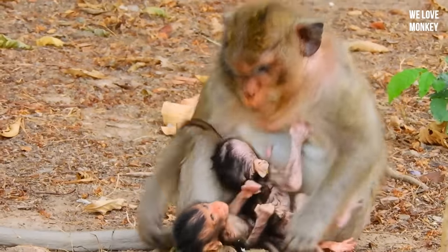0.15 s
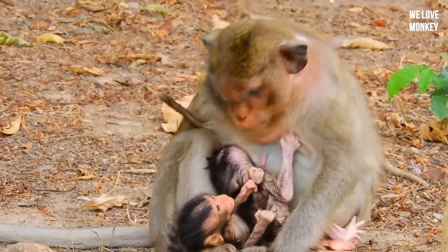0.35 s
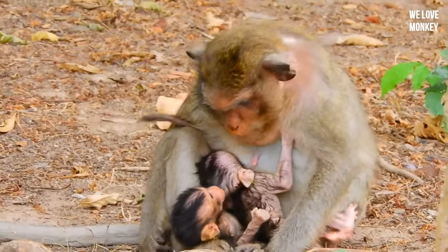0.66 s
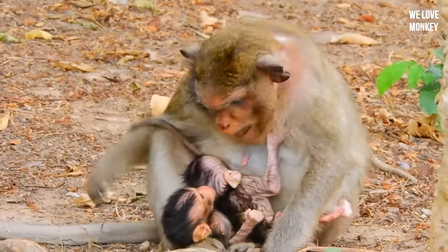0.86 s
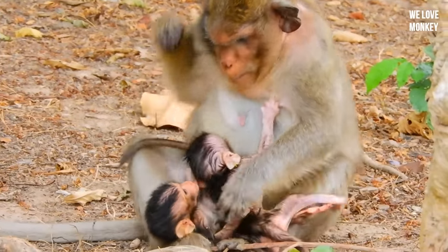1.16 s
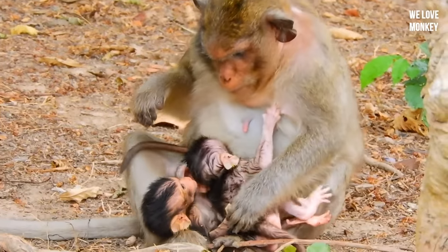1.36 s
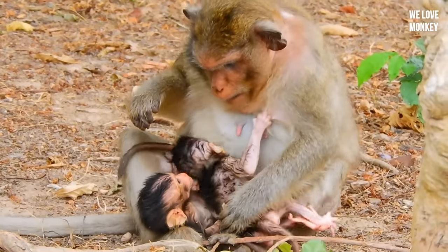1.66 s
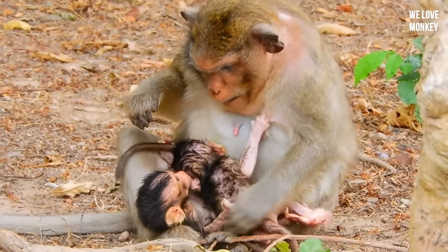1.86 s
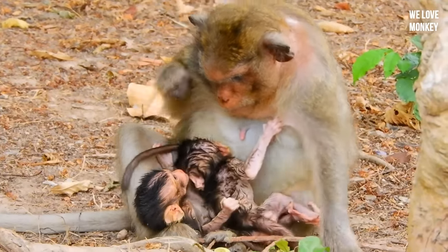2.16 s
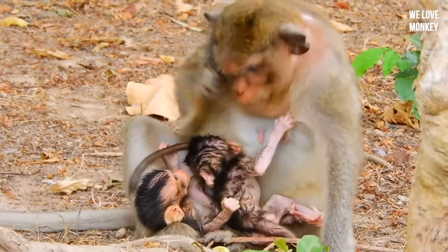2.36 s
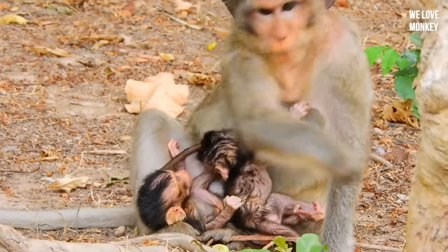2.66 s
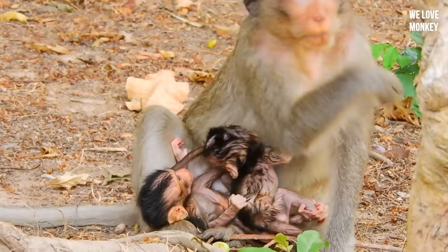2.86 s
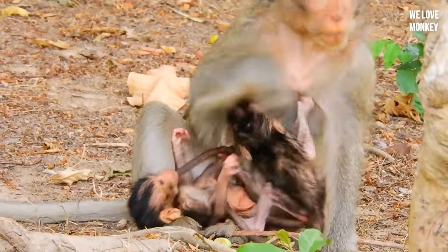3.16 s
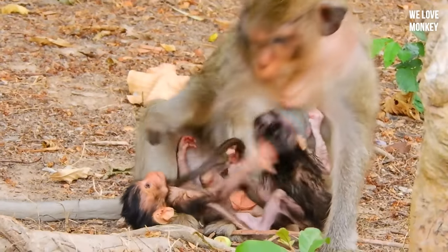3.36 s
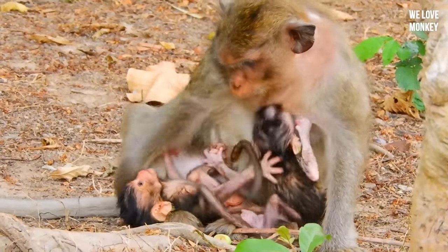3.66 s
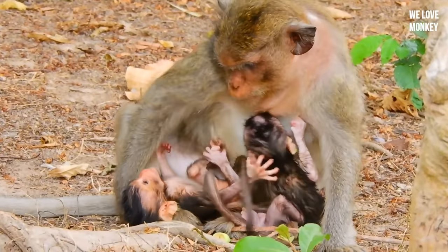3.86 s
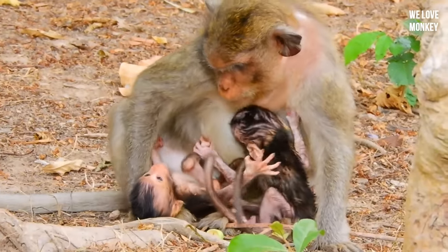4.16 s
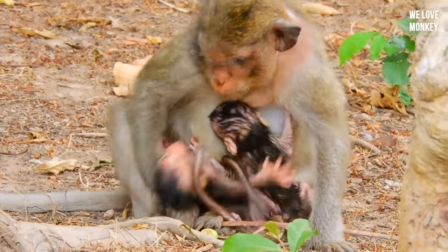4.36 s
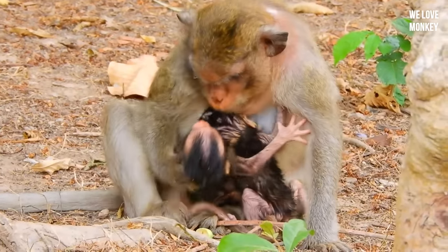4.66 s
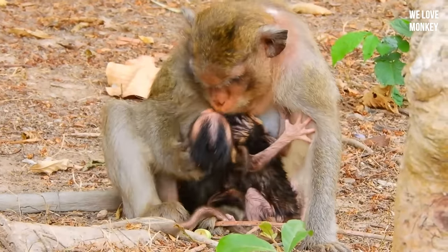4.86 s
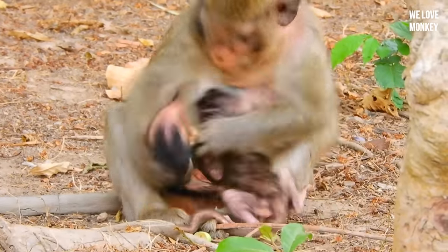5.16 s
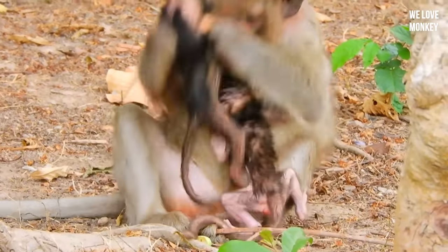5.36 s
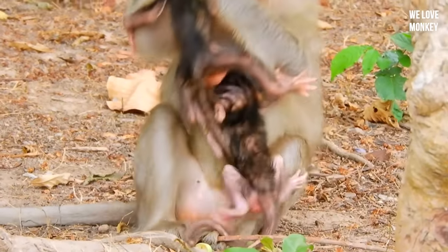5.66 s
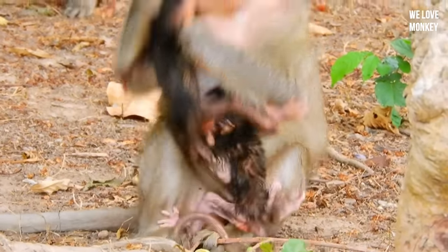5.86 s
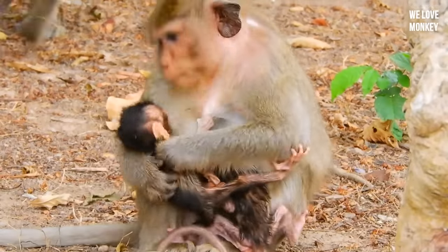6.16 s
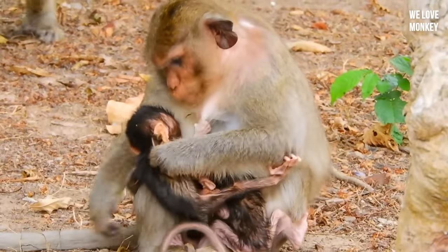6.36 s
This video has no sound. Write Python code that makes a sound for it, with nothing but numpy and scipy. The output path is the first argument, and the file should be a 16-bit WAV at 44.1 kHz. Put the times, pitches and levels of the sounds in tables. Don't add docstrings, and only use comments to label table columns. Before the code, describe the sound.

Outdoors under trees, close stereo microphone. At once a newborn monkey gives a very high, piercing cry that roughens into a thin rasping scream, breaking off at about 0.27 s with a short scattered echo. Soft insect hiss, a faint tyre whine and low, slowly swelling traffic rumble continue throughout. Tiny dry taps and snaps fall at 0.4, 0.7 and 0.9 s. From 0.7 to 1.65 s a far bird, off to the left, faintly pipes four thin notes. After a lull, clipped harsh chirps, mostly falling, come from 2.8 to 4.05 s, strongest around 3.0, 3.6 and 3.8. From 4.2 to 5.3 s dry leaves rustle and crunch, with a hand press and a loud crisp snap at 5.1. A wavering, raspy cry follows at 5.36-5.56 s, falling in pitch. Further leaf crackles come around 6.0, with a light touch at 6.2 and a faint crunch at 6.4.

```python
import sys
import numpy as np
from scipy import signal
from scipy.io import wavfile
from scipy.ndimage import uniform_filter1d, map_coordinates

SR = 44100
rng = np.random.default_rng(int(sys.argv[2]) if len(sys.argv) > 2 else 0)


def digitize_waveform(pressure):
    field = np.atleast_2d(pressure).T
    bounded = np.clip(field, -1, 1)
    quanta = np.round(bounded * 32767).astype(np.int16)
    wavfile.write(sys.argv[1], SR, quanta)


def ratio(d):
    e = np.asarray(d, float) / 20
    return 10 ** e


N = 287091
TIME = np.arange(N) / SR


def squeaks():
    return whistled_cries() + lower_voice() + rasp()


# t/s, f/Hz, level/dB, roughness/0-1
SCREAM = [
    (0.042, 9300, -14, 0.42),
    (0.06, 9000, -29.5, 0.68),
    (0.08, 9600, -20.5, 0.4),
    (0.11, 10000, -23, 0.65),
    (0.124, 10550, -28, 0),
    (0.147, 10700, -29.5, 0.1),
    (0.163, 11200, -38.5, 0.33),
    (0.18, 10500, -30.5, 0.65),
    (0.222, 10310, -30, 0.7),
]
# t/s, length/s, level/dB, f from/Hz, f to/Hz
LAST_GASP = [
    (.224, 0.02, -22, 9660, 9270),
]
# t/s, length/s, level/dB, f from/Hz, f to/Hz
CHIRPS = [
    (2.826, 0.0083, -31.5, 6300, 4952),
    (2.968, .045, -19.5, 8390, 5540),
    (3.15, 0.036, -28.5, 11600, 9200),
    (3.179, 0.028, -21.5, 7780, 6770),
    (3.371, .028, -19, 6910, 4765),
    (3.588, .021, -21, 8220, 7380),
    (3.611, .024, -13, 9200, 4068),
    (3.782, .019, -16.5, 7990, 8213),
    (3.803, 0.02, -11, 8345, 7575),
    (4.027, .011, -19.5, 6470, 4150),
]
# t/s, f/Hz, level/dB
PURE = [
    [(0.002, 8190, -46), (0.01, 8630, -16), (0.017, 8690, -16.5), (0.023, 9130, -22), (0.032, 9252, -2.5),
     (0.041, 9100, -9), (0.045, 9500, -40)],
    [(5.358, 6223, -51.5), (5.397, 5940, -51), (5.418, 7330, -33.5), (5.437, 6870, -32.5),
     (5.456, 6890, -21), (5.478, 5717, -20.5), (5.495, 5400, -28), (5.523, 4594, -20), (5.543, 4646, -31)],
]


def whistled_cries():
    rough_cries = [SCREAM] + sung_notes(LAST_GASP, (.1, .02)) + sung_notes(CHIRPS, (.5, .2))
    pure_cries = [[(*row, .012) for row in cry] for cry in PURE]
    return band(whistle(rough_cries), 3700, 19000) + whistle(pure_cries)


# t/s, level below the whistle/dB
BEATING = [
    (0, -27),
    (.04, -26.5),
    (.09, -19.5),
    (.25, -25.5),
    (2.8, -47.5),
    (3.6, -26),
    (5.35, -43),
    (5.46, -35.5),
]
# t/s, level/dB
OVERTONE = [
    (0, -40),
    (3.8, -34),
    (4.03, -22.5),
    (5.35, -10),
    (5.46, -18),
    (5.48, -23),
    (5.51, -10),
]


def whistle(tables):
    height, phase = fold(tables, chaos_hz=960)
    beat = np.exp(2j * np.pi * 3916 * TIME)
    side = ratio(in_time(BEATING)[0])
    cycle = np.exp(1j * phase) * (1 + side * (1 / beat + .45 * beat) + 4.7 * (side / beat) ** 2)
    below_top = np.gradient(phase) < 2 * np.pi * 8000 / SR
    cycle += ratio(in_time(OVERTONE)[0]) * np.exp(2j * phase) * below_top
    return (height * cycle).real


# t/s, length/s, level/dB, f from/Hz, f to/Hz
VOICE = [(.224, .027, -33, 7410, 7165), (2.972, .044, -12, 5243, 4400), (3.165, .02, -34, 4934, 4850),
         (3.19, .026, -22.5, 5034, 4620), (3.362, 0.0125, -33, 3390, 3923),
         (3.376, 0.029, -22.5, 4200, 4134), (3.585, .022, -32.5, 3670, 4300),
         (3.608, .019, -20, 5264, 2905), (3.799, 0.012, -30, 3860, 3780), (3.814, 0.0155, -21, 4247, 4080),
         (4.021, 0.0125, -28, 3500, 2875)]
# t/s, length/s, level/dB, f from/Hz, f to/Hz
SPLIT = [
    (2.986, .026, -16.5, 9400, 8900),
    (3.182, .021, -15.5, 10200, 10000),
    (3.589, .032, -32, 12200, 11700),
    (3.776, .018, -31.5, 10220, 10200),
    (3.796, .028, -45, 14580, 14100),
    (5.464, .02, -25, 8400, 7000),
]


def lower_voice():
    out = np.zeros(N)
    for rows in (VOICE, SPLIT):
        height, phase = fold(sung_notes(rows, (.5, .25)), chaos_hz=648)
        out += (height * np.exp(1j * phase)).real
    return out


# t/s, length/s, upper mouth level/dB, lower mouth level/dB, chest level/dB
RASP = [(.044, 0.006, -22, -36, -62), (.053, 0.086, -32, -50, -69), (.122, 0.06, -31, -43, -68),
        (.168, 0.094, -29.5, -43.5, -65), (2.826, 0.017, -47, -54, -61), (2.967, 0.028, -14.5, -18, -54.5),
        (2.992, 0.02, -11, -10, -35), (3.147, 0.013, -27, -38, -62), (3.164, 0.02, -11, -24, -42),
        (3.183, 0.0364, -19, -24, -42), (3.371, 0.024, -22.5, -17, -30.5),
        (3.588, 0.021, -22.5, -21, -21.5), (3.609, 0.029, -25, -15, -33), (3.777, 0.025, -20, -30.5, -29.5),
        (3.805, 0.02, -35, -14.5, -12), (4.028, 0.021, -35, -47, -53), (5.364, 0.022, -36.5, -46.5, -72),
        (5.387, .064, -43.5, -53, -60), (5.455, .021, -32, -23, -49), (5.477, 0.041, -20.5, -13.5, -39),
        (5.513, 0.0473, -26.5, -19, -62)]
# f/Hz, width/Hz, level/dB
CHEST = [
    (3152, 2100, 1.5),
    (3500, 2100, 12.5),
]
# f/Hz, width/Hz, level/dB
LOW_MOUTH = [
    (4314, 590, -7),
    (5424, 2200, 12.5),
    (6400, 1570, -1.5),
]
# f/Hz, width/Hz, level/dB
HIGH_MOUTH = [
    (7500, 560, -2),
    (9000, 1332, 10),
    (10200, 2800, 2),
    (11000, 3300, 0.5),
    (14200, 2800, -26),
]


def rasp():
    levels = in_time(sum(bursts(RASP), []))
    high_db, low_db, chest_db = uniform_filter1d(levels, size=60)
    out = ratio(chest_db) * band(chaos(CHEST, slap_db=9.0, slap_hz=350.6), 2750, 4652)
    out += ratio(low_db) * band(chaos(LOW_MOUTH, slap_db=0.0, slap_hz=349), 4360, 7550)
    upper = chaos(HIGH_MOUTH, slap_db=1.9, slap_hz=350)
    out += ratio(high_db) * band(upper, 6000, 11760)
    strain_db = high_db + .42 * (chest_db - high_db) - 1.5
    out += ratio(strain_db) * band(upper, 11900, 21000)
    puffs = chaos([(1281, 2100, 0), (450, 400, -6.5)], slap_db=1.5, slap_hz=200)
    out += ratio(low_db - 30.5) * puffs
    return ratio(-5) * gate(bursts(RASP), edge_s=0.00106) * out


def fold(tables, chaos_hz):
    hz, level_db, rough = in_time(sum(map(list, tables), []))
    rough = np.clip(rough, 0, 1)
    noise = rng.standard_normal(N) + 1j * rng.standard_normal(N)
    wander = rms_one(signal.sosfilt(signal.butter(4, chaos_hz, fs=SR, output="sos"), noise))
    shape = np.sqrt(1 - rough) + np.sqrt(rough) * wander
    glide_s = 0.0072
    hz = uniform_filter1d(hz, int(glide_s * SR) + 1)
    hz = hz * (1 + .05 * rough * drift(150))
    height = np.sqrt(2) * ratio(level_db) * gate(tables, edge_s=.002) * shape
    return height, 2 * np.pi * np.cumsum(hz) / SR


def chaos(modes, slap_db, slap_hz):
    slaps = rng.standard_normal(N) * ratio(slap_db * drift(slap_hz))
    return rms_one(sum(ratio(db + 4.2 * drift(100)) * mouth(slaps, [(hz, w, 0)]) for hz, w, db in modes))


def sung_notes(rows, rough):
    share = np.array([0, 0.2786, 1 - 0.59, 1])
    shape_db = np.array([-11.5, 0, -5.5, -10])
    rough_curve = rough[0] + (rough[1] - rough[0]) * share
    return [list(zip(s + n * share, a + (b - a) * share, db + shape_db, rough_curve))
            for s, n, (_, _, db, a, b) in zip(*spans(rows), rows)]


def bursts(rows):
    rise_s, fall_s = 0.0083, .009
    shape_db = np.array([-8, 0, -2, -13])
    out = []
    for s, n, row in zip(*spans(rows), rows):
        at = s + np.array([0, min(rise_s, 0.66 * n), n - min(fall_s, .5 * n), n])
        out.append(list(zip(at, *(db + shape_db for db in row[2:]))))
    return out


# t/s, peak level/dB, length/s, brightness f/Hz
CRUNCH = [(4.269, -41, 0.017, 8080), (4.392, -39, 0.016, 8210), (4.499, -18, 0.018, 8700),
          (4.517, -22, 0.0052, 9200), (4.6117, -23, 0.0038, 8300), (4.684, -33.5, 0.017, 8230),
          (4.7464, -32, 0.025, 8300), (4.7974, -35, 0.01, 8650), (4.878, -29.5, 0.013, 6950),
          (5.103, -22.5, 0.026, 8360), (5.9834, -30, 0.012, 8460), (6, -22, 0.015, 8540),
          (6.025, -34.5, 0.039, 8160), (6.0868, -38, 0.0095, 5210), (6.4284, -41.5, 0.02, 9000)]
# t/s, peak level/dB, length/s, brightness f/Hz
SNAP = [(0.6689, -22, 0.00087, 6080), (0.9314, -24.5, 0.0015, 2850), (0.9408, -26.5, 0.0013, 5340),
        (4.6588, -45, 0.002, 8990), (4.7042, -21, 0.0015, 5400), (4.7124, -36, 0.002, 9200),
        (4.7545, -30, .0015, 7500), (4.7731, -30, 0.002, 9050), (4.8299, -28, 0.002, 6260),
        (4.9571, -24.5, 0.0011, 8950), (5.1012, -5.5, .001, 7500), (5.2545, -36.5, 0.0023, 7540),
        (5.9269, -28, 0.0024, 8400), (5.9688, -31, 0.002, 8590)]
# t/s, peak level/dB, length/s, brightness f/Hz
PAW = [
    (5.096, -22.5, 0.023, 4000),
    (6.2, -29, 0.0049, 9200),
    (0.37, -26, 0.0025, 1720),
]
# t/s, level/dB
RUSTLE = [
    [(4.15, -56.5), (4.498, -64.5), (4.614, -52), (5.3, -62.5)],
    [(5.74, -47), (6.206, -62.5), (6.51, -58.5)],
]
# f/Hz, width/Hz, level/dB
CRACKLE_PEAKS = [
    (3484, 1540, -4),
    (5130, 960, 6.5),
    (7680, 2700, 3.5),
    (9200, 1860, 8.5),
    (12200, 14000, -6),
]


def leaves():
    snaps = ratio(4.4 * np.minimum(rng.exponential(1, N), 4)) * rng.choice([-1, 1], N)
    chance = rng.random(N)
    dense = rms_one(snaps * (chance < 9000 / SR))
    body, own = np.zeros(N), np.zeros(N)
    t = TIME[:SR // 5]
    for s, db, length, hz in list(CRUNCH) + list(SNAP) + list(PAW):
        at = int(s * SR)
        decay = np.exp(-t / max(length, .001)) * (1 - np.exp(-t / 0.00032))
        burst = dense[at:at + len(t)] * decay[:N - at]
        burst[0] += 4.0
        body[at:at + len(t)] += ratio(db - 15.5) * burst
        own[at:at + len(t)] += ratio(db - 3) * resonate(resonate(burst, hz, 0.2 * hz), hz, 0.2 * hz)
    swarm = rms_one(snaps * (chance < 4000 * ratio(5.0 * drift(25)) / SR))
    rustle_db = in_time(sum(map(list, RUSTLE), []))[0] - 5.0
    body += ratio(rustle_db) * gate(RUSTLE, edge_s=0.24) * swarm
    ringing = sum(ratio(db) * resonate(resonate(body, hz, w), hz, w) for hz, w, db in CRACKLE_PEAKS)
    return band(own + ringing, 1450, 12900)


def trees(x):
    thin = signal.sosfilt(signal.butter(2, 3975, "high", fs=SR, output="sos"), x)
    dull = signal.sosfiltfilt(signal.butter(2, 7200, fs=SR, output="sos"), thin)
    far = scatter(dull, t60=.66, level_db=-9, start_s=0.008, alike=1.0)
    far += scatter(thin - dull, t60=.47, level_db=-9, start_s=0.008, alike=0.99)
    return scatter(x, t60=.045, level_db=-5.5, start_s=.0005, alike=.1) + sway(far)


def scatter(x, t60, level_db, start_s, alike):
    t = TIME[:SR]
    shared, own = rng.standard_normal(SR), rng.standard_normal((2, SR))
    tail = (alike * shared + own) * ratio(-60 * t / t60) * np.clip(t / start_s, 0, 1)
    tail /= np.sqrt(np.sum(tail ** 2, axis=1, keepdims=True))
    return ratio(level_db) * signal.fftconvolve(x[None], tail, axes=1)[:, :N]


def sway(x):
    at = np.arange(N) + 1.4e-5 * SR * drift(60)
    return np.array([map_coordinates(c, [at], order=3, mode="nearest") for c in x])


# t/s, length/s, f/Hz, level/dB, octave level/dB
BIRD = [
    (.71, 0.13, 3545, -64, -59),
    (0.956, .24, 3654, -58, -56),
    (1.232, .23, 3520, -60, -56),
    (1.503, 0.14, 3540, -61, -58.5),
]


def bird():
    scoop_hz, onset_db, swell_s = 15, -4, 0.055
    sag_hz_per_s, fade_db_per_s, octave_fade_db_per_s = 390, 34, 94.5
    tables = []
    for s, n, (_, _, hz, db, up_db) in zip(*spans(BIRD), BIRD):
        onset = (s, hz - scoop_hz, db + onset_db, up_db + onset_db)
        full = (s + swell_s, hz, db, up_db)
        end = (s + n, hz - sag_hz_per_s * n, db - fade_db_per_s * n, up_db - octave_fade_db_per_s * n)
        tables.append([onset, full, end])
    hz, level_db, octave_db = in_time(sum(tables, []))
    phase = 2 * np.pi * np.cumsum(hz * (1 + 0.00402 * drift(60))) / SR
    tone = ratio(level_db) * np.sin(phase) + ratio(octave_db) * np.sin(2 * phase)
    return np.sqrt(2) * tone * gate(tables, edge_s=.012) * ratio(3 * drift(25))


# f/Hz, level/dB per Hz
RUMBLE = [(12, -42), (20, -16), (92, 2.5), (108, -2), (128, -5), (190, -11.5), (252, -26.5), (296, -16),
          (382, -30.5), (500, -43.5), (650, -63), (1100, -120)]
# t/s, level/dB
RUMBLE_LEVEL = [
    (0, -42.5),
    (2.1, -38.5),
    (2.4, -41),
    (3.7, -37.5),
    (4.1, -39),
    (5.0, -41),
    (5.4, -37.5),
    (6.51, -40),
]


def rumble():
    drone = ratio(-5) * mouth(rng.standard_normal(N), [(100.5, 14, 0)])
    return ratio(in_time(RUMBLE_LEVEL)[0]) * (banded_noise(RUMBLE, step=1 / 3, patchy_db=1.0) + drone)


# f/Hz, level/dB per Hz
HISS = [(240, -38.5), (400, -10.5), (432, -4.5), (799, -6.5), (931, -5.5), (1120, -9), (1860, -11),
        (2240, -10.5), (2410, -10), (2990, -12.5), (5200, -9), (7080, -12), (8910, -14), (14600, -33.5),
        (15700, -41)]
# t/s, level/dB
HISS_LEVEL = [
    (0, -53.5),
    (.55, -59),
    (1.1, -54.5),
    (2.8, -55),
    (4.2, -54.5),
    (6.51, -54.5),
]


def hiss():
    whine = ratio(-16.5 + 2.7 * drift(6.7)) * mouth(rng.standard_normal(N), [(928, 110, 0)])
    return ratio(in_time(HISS_LEVEL)[0]) * (banded_noise(HISS, step=1 / 4, patchy_db=1.42) + whine)


# f/Hz, likeness/0-1
LIKENESS = [
    (30, 0.99),
    (90, 0.97),
    (170, 0.92),
    (350, 0.48),
    (700, 0.433),
    (2000, 0.27),
    (6000, 0.17),
    (14000, 0.468),
]


def banded_noise(spectrum, step, patchy_db):
    out, gust, white = 0, drift(13.0), rng.standard_normal((2, 2, N))
    octaves = np.log2(spectrum[-1][0] / spectrum[0][0])
    edges = spectrum[0][0] * 2 ** np.arange(0, octaves, step)
    for k, (low, high) in enumerate(zip(edges, edges[1:])):
        band_pass = signal.butter(2, [low, high], "band", fs=SR, output="sos")
        mid, side = signal.sosfilt(band_pass, white[k % 2])
        hz = np.sqrt(low * high)
        alike = np.clip(at_hz(LIKENESS, hz), 0, 1)
        gain = ratio(at_hz(spectrum, hz) + patchy_db * (drift(5) + .5 * gust))
        out = out + gain * (np.sqrt(1 + alike) * mid + np.sqrt(1 - alike) * side * [[1], [-1]])
    return out / np.sqrt(np.mean(out.mean(axis=0) ** 2))


def rms_one(x):
    return x / np.sqrt(np.mean(np.abs(x) ** 2) + 1e-20)


def in_time(rows):
    s, *columns = np.transpose(rows)
    return [np.interp(TIME, s, c) for c in columns]


def gate(tables, edge_s):
    ends = [(t[0][0] - edge_s, t[0][0], t[-1][0], t[-1][0] + edge_s) for t in tables]
    return np.clip(sum(np.interp(TIME, e, [0, 1, 1, 0]) for e in ends), 0, 1)


def spans(rows):
    s, length = np.transpose(rows)[:2]
    return s, np.clip(length, .003, np.diff(s, append=99) - .0005)


def at_hz(points, hz):
    return np.interp(np.log(hz), np.log(np.array(points)[:, 0]), np.array(points)[:, 1])


def drift(rate_hz):
    r = np.exp(-2 * np.pi * rate_hz / SR)
    return rms_one(signal.lfilter([1], [1, -2 * r, r * r], rng.standard_normal(N + SR))[SR:])


def resonate(x, hz, width_hz):
    r = np.exp(-np.pi * width_hz / SR)
    poles = [1, -2 * r * np.cos(2 * np.pi * hz / SR), r * r]
    return signal.lfilter(np.array([1, 0, -1]) * (1 - r * r) / 2, poles, x)


def mouth(x, modes):
    return rms_one(sum(ratio(db) * resonate(resonate(x, hz, w), hz, w) for hz, w, db in modes))


def band(x, low_hz, high_hz):
    return signal.sosfilt(signal.butter(6, [low_hz, high_hz], "band", fs=SR, output="sos"), x)


# t/s, left minus right level/dB
PAN = [
    (0, -5),
    (.06, 0.5),
    (3.0, 1),
    (4.1, 0.4),
    (6.5, 2.5),
]


def scene():
    near = squeaks() + leaves()
    pan_db = in_time(PAN)[0] * [[.5], [-.5]]
    return (near + trees(near)) * ratio(pan_db) + bird() * ratio([[.6], [-.6]]) + rumble() + hiss()


def band_limit(x):
    return signal.sosfilt(signal.butter(12, 15880, fs=SR, output="sos"), x)


def record(dry):
    cut = signal.cheby2(16, 60, 16150, fs=SR, output="sos")
    rounded = 1.344 * np.tanh(dry / 1.382)
    return band_limit(signal.sosfilt(cut, rounded) - .0018)


dry = scene()
out = record(dry)
digitize_waveform(out)
```